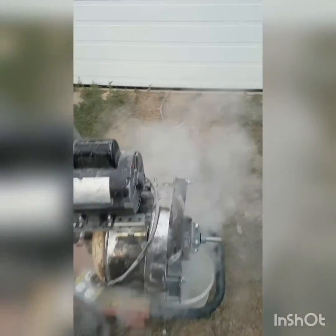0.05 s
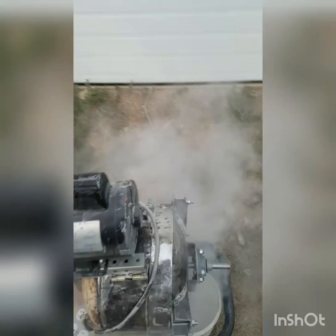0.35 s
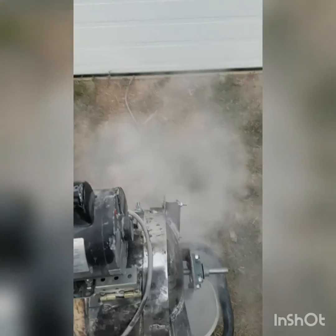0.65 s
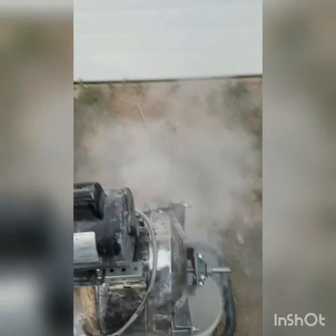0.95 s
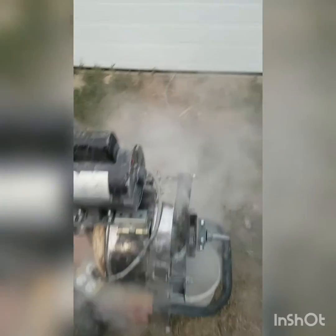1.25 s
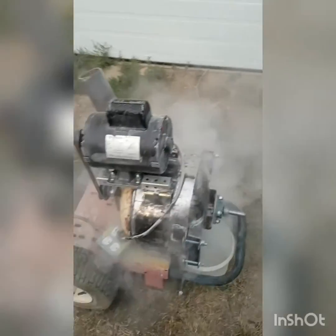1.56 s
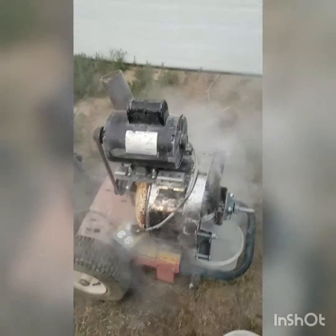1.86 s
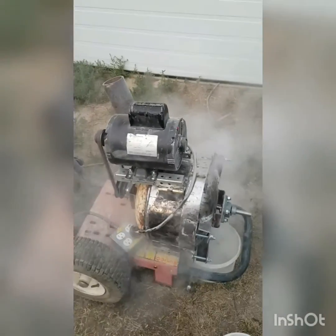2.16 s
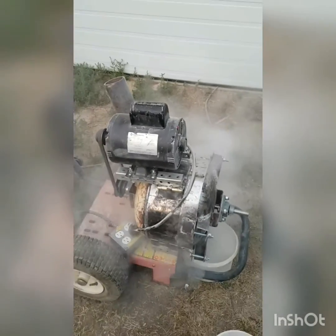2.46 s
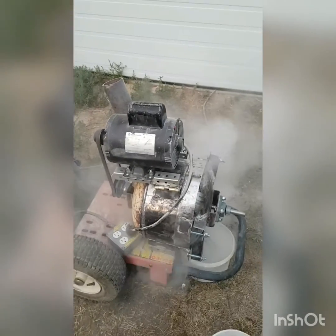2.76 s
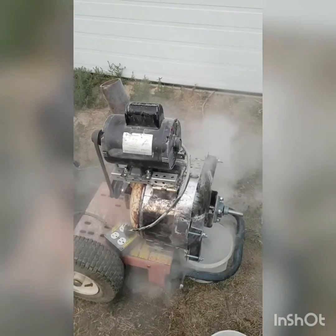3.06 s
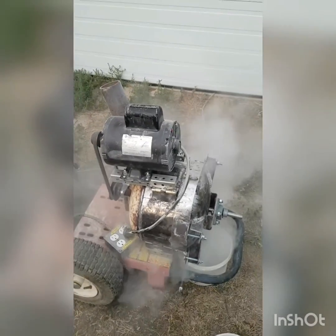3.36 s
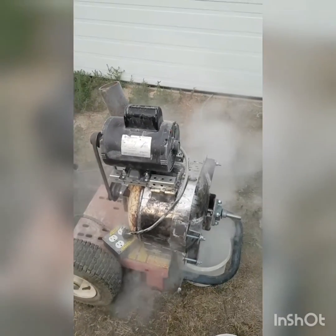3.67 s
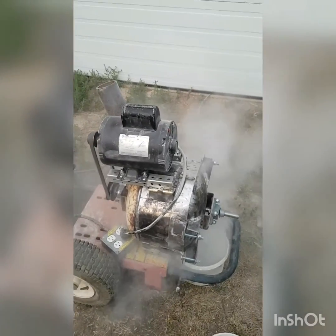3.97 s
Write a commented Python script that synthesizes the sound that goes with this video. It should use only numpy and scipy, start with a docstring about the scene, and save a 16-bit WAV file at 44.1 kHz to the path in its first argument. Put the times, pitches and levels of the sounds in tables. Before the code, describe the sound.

Rock crusher tumbling and breaking stones, with a hollow roar and hissing grit.

```python
"""Stones clatter over a hollow roar: a small motor-driven rock crusher is running outdoors, close by.
The stones tumble in its steel drum, making the air inside boom and the shell ring.
After about a second a fresh rock goes in with a crack and bumps about, jolting the frame, until it is
broken. The roar sinks, leaving the hiss of grit on steel, and then builds again."""
import sys
import numpy as np
from scipy import signal
from scipy.fft import rfft, irfft, next_fast_len
from scipy.io import wavfile

SR = 44100
rng = np.random.default_rng(int(sys.argv[2]) if len(sys.argv) > 2 else 0)


def digitize_waveform(pressure):
    """Quantize a signal to 16-bit integers and store it at the path in sys.argv[1].

    Rows of a 2-D input are taken as channels; values are limited to [-1, 1].
    """
    field = np.atleast_2d(pressure).T
    bounded = np.clip(field, -1, 1)
    quanta = np.round(bounded * 32767).astype(np.int16)
    wavfile.write(sys.argv[1], SR, quanta)


N = 176400  # 4 seconds

# All levels are relative: each layer gets its own gain when it is mixed.
# how loud the running crusher is (t/s, drum roar/dB, stone clatter/dB, grit hiss/dB)
RUNNING_LEVELS = [(0, -18, -14, -24), (.25, -23, -14, -26.5), (.295, -21.5, -16, -26.5),
                  (.36, -20.5, -12.5, -20.5), (.56, -20.5, -23, -24), (.68, -22.5, -14.5, -22),
                  (.85, -19.5, -13, -25.5), (1.04, -19.5, -12.5, -20), (1.085, -19.5, -17, -25),
                  (1.13, -26, -39, -18.5), (1.38, -39, -20.5, -19.5), (1.55, -39, -18.5, -20),
                  (1.8, -37.5, -25, -19), (2.25, -37.5, -29.5, -19), (2.45, -40, -23.5, -20.5),
                  (2.68, -36.5, -20, -18.5), (2.9, -32, -24.5, -22.5), (3.0, -33, -18.5, -20),
                  (3.2, -27.5, -19, -17.5), (3.55, -28.5, -20, -20.5), (3.68, -25, -13.5, -21.5),
                  (3.83, -23, -17.5, -20.5), (3.92, -23.5, -13, -18), (4, -23, -13.5, -18.5)]
# blows on the big rock (t/s, thud/dB, crack and clang/dB, splinters/dB, frame jolt left minus right/dB)
ROCK_BLOWS = [(1.093, -30, -10.5, -6.5, 0), (1.125, -10, -9, -15, 2), (1.151, -15.5, -19, -15, 0),
              (1.176, -24, -19, -16.5, 0), (1.19, -21, -13, -17.5, 2), (1.223, -11, -10.5, -22, 3),
              (1.241, -15, -16.5, -16.5, 3), (1.273, -18, -13, -18, 2), (1.291, -12, -12.5, -20, 14),
              (1.331, -17.5, -13, -24, -16), (1.41, -37, -30, -22, 9), (1.661, -23.5, -13, -17, -9),
              (1.681, -25, -33, -18, 9), (1.716, -38, -14, -23, 0), (1.897, -27, -23, -27, -17),
              (1.962, -31, -17, -17, -17), (2.13, -40, -18.5, -24.5, 0), (2.277, -20, -15, -22, 15)]
# single stones clanking on the shell (t/s, level/dB)
STONE_CLANKS = [(.005, -10.5), (.118, -32), (.164, -14.5), (.207, -19), (.311, -10.5), (.337, -16),
                (.446, -12.5), (.5, -9.5), (.538, -13.5), (.592, -11.5), (.77, -15), (.824, -22),
                (.859, -18), (1.445, -18), (1.47, -18), (1.502, -11), (1.582, -16), (1.617, -21),
                (1.935, -14), (2.053, -17), (2.095, -26), (2.196, -18), (2.298, -19.5), (2.97, -30),
                (3.312, -17), (3.61, -18), (3.889, -17.5)]
# spurts of grit, and swells of the drum's hollow ring as the load falls (t/s, length/s, level/dB)
GRIT_SPURTS = [(0, 0.028, -18.5), (0.056, 0.059, -18.5), (0.255, .04, -18), (0.342, 0.043, -21),
               (0.414, 0.029, -24), (0.595, .04, -19), (0.629, 0.044, -16.5), (0.884, 0.073, -17.5),
               (0.959, 0.083, -17), (2.2, 0.15, -31), (3.005, 0.03, -19), (3.888, 0.042, -19.5)]
DRUM_SWELLS = [(.07, 0.024, -30), (.42, 0.047, -13.5), (.55, 0.084, -13.5), (.72, 0.064, -14),
               (.88, 0.11, -17.5), (1.0, 0.043, -30), (3.87, 0.12, -25)]
# how freely the shell rings: the rock lying in it damps it (t/s, level/dB)
SHELL_FREEDOM = [(0, -1.5), (1.05, -3.5), (1.4, -17.5), (3.0, -8.5), (4, -5)]

# ringing tones of the air in the drum, the shell under stones and under grit, and the wheeled frame
# (f/Hz, time to fade by 60 dB/s, level/dB)
AIR_TONES = [(169, 0.046, -7.5), (204, 0.085, -5), (213, 0.18, -9), (317.4, 0.11, 3), (362, 0.18, 4.5)]
SHELL_TONES = [(702, 0.069, -17), (807, 0.096, -5.5), (1045.5, 0.14, 2), (1224, 0.056, -0.5),
               (1263, 0.28, -0.5), (1355, 0.16, 0), (1410, 0.11, -11), (1527, 0.14, -3.5),
               (1640, 0.24, -1.5), (1723, 0.1, 2), (1945, 0.084, 1), (2506, 0.4, -11)]
GRIT_TONES = [(2835, 0.18, -2.5), (3319, 0.09, -14), (3430, 0.14, -1.5), (3848, 0.028, 8), (4020, 0.037, 7),
              (5760, .07, 8), (6930, 0.079, 1.5), (7390, 0.031, -0.5)]
FRAME_TONES = [(58.4, .09, -10), (84, .08, -1.5), (119, 0.052, -4.5), (166, .06, -1), (236, 0.033, -3)]

# tone colour of each kind of hit, from bass to treble (f/Hz, level/dB)
SPRAY_SPECTRUM = [(1000, -25), (3000, -10), (4700, 0.5), (5800, 3.5), (7600, 2), (8600, -8.5),
                  (9800, -27.5), (11000, -22), (12500, -9.5), (16000, -8)]
CHIP_SPECTRUM = [(200, -13.5), (900, -15), (1500, 0), (2000, 6), (2900, -1.5), (4000, -2.5), (5000, -2.5),
                 (7000, -5), (12000, -39)]
DUST_SPECTRUM = [(3000, -51), (7500, -33), (8600, 0.5), (10000, -3.5), (12500, 4), (16000, -11.5)]
BOOM_SPECTRUM = [(20, -31), (35, -37), (60, -15.5), (125, -10.5), (160, -1), (260, 0), (400, -5.5),
                 (480, -14.5), (680, -3), (900, -6.5), (1500, -38)]
SHELL_SPECTRUM = [(100, -37.5), (500, -15), (900, -7.5), (1200, -2), (1700, 2), (2100, -1.5), (2800, -13),
                  (4000, -13), (8000, -52.5), (16000, -80)]
CRACK_SPECTRUM = [(100, -11), (400, -5.5), (750, 3), (1400, -6), (2200, 0), (3000, -17), (3900, -1.5),
                  (4600, -13), (8000, -27), (16000, -32)]
THUD_SPECTRUM = [(25, -22), (60, -3), (110, 2.5), (190, 2.5), (400, -2.5), (750, -5.5), (1500, -30),
                 (5000, -40)]
SPLINTER_SPECTRUM = [(200, -11), (800, -13), (2500, -2.5), (4000, -5), (7500, -11.5), (9500, -23.5),
                     (12500, -20.5), (16000, -29)]

# how much louder the left side is than the right (f/Hz, level/dB)
LEFT_MINUS_RIGHT = [(60, -3), (200, -0.5), (500, -5), (800, 1), (1300, 4.5), (2000, 0.5), (3000, -1),
                    (5000, -2), (6200, -7), (7700, -12.5), (9000, 0), (10200, 7), (12000, 5), (15500, 7.5)]
# the shell's panels swing against each other, so the sides hear them out of step (f/Hz, left lead/rad)
PANEL_PHASE = [(100, -8), (500, 2.4), (750, -1.85), (1280, -1.4), (1480, -2), (2500, -2), (3700, -2),
               (5000, -5.5)]

# a decay is the time a hit takes to fall to about a third of its strength
CRACK_DECAY_S, THUD_DECAY_S, CLANG_DECAY_S, SPLINTER_DECAY_S = 0.004, 0.0098, 0.031, 0.03
TIME = np.arange(N) / SR


def amp(db):
    """Turn decibels into a gain."""
    return 10 ** (np.asarray(db) / 20)


def unit(x):
    """Scale to an average strength (rms) of 1."""
    return x / np.sqrt(np.mean(x ** 2))


def level_curve(table, column):
    """Gain over time, gliding between the levels in one column of a table."""
    rows = np.array(table)
    return amp(np.interp(TIME, rows[:, 0], rows[:, column]))


def convolve(x, response):
    """Make every sample of x set off a copy of the response."""
    return signal.fftconvolve(np.atleast_2d(x), np.atleast_2d(response), axes=1)[:, :N]


def colour(spectrum, size=8192):
    """A short click with the given tone colour."""
    hz, db = np.array(spectrum).T
    grid = np.maximum(np.fft.rfftfreq(size, 1 / SR), 1)
    gains = amp(np.interp(np.log(grid), np.log(hz), db))
    cepstrum = irfft(np.log(gains))
    # pack the energy at the start of the click (minimum phase)
    cepstrum[1:size // 2] *= 2
    cepstrum[size // 2 + 1:] = 0
    return irfft(np.exp(rfft(cepstrum)))


def knock(hits, spectrum):
    """Each hit makes a short knock of the given tone colour."""
    click = colour(spectrum)
    return convolve(hits, click / np.linalg.norm(click))


def ring(hits, tones, size=8192):
    """Each hit sets off a group of fading tones."""
    t = np.arange(size) / SR
    response = sum(amp(db) / np.sqrt(fade_s) * amp(-60 * t / fade_s) * np.cos(2 * np.pi * hz * t)
                   for hz, fade_s, db in tones)
    return convolve(hits, response / np.linalg.norm(response))


def out_of_step(x):
    """Shift the left and right waves against each other, as the swinging panels do."""
    hz, radians = np.array(PANEL_PHASE).T
    size = next_fast_len(N + 4096)
    lead = np.interp(np.fft.rfftfreq(size, 1 / SR), hz, radians)
    turn = np.exp(1j * lead * np.array([[.5], [-.5]]))
    return irfft(rfft(x, size) * turn, size)[:, :N]


def impacts(per_s, scatter_db):
    """Randomly timed hits of uneven strength."""
    return (rng.random(N) < per_s / SR) * amp(scatter_db * np.clip(rng.standard_normal(N), -2, 2))


def contacts(per_s, scatter_db, shared):
    """A dense stream of tiny hits; the shared part reaches both sides alike."""
    both, left, right = (unit(impacts(per_s, scatter_db) * rng.choice([-1, 1], N)) for _ in range(3))
    return np.sqrt(shared) * both + np.sqrt(1 - shared) * np.array([left, right])


def showers(per_s, decay_s, scatter_db, steady):
    """Loudness curve of random bursts that start sharply and die away, over a steady part."""
    power = signal.lfilter([1], [1, -np.exp(-2 / (decay_s * SR))], impacts(per_s, scatter_db))
    return unit(np.sqrt(power / power.mean() + steady))


def blows(rows, decay_s, column):
    """Loudness curve of timed blows, each dying away from its level in the given column."""
    fades = ((TIME >= row[0]) * amp(row[column]) * np.exp(-np.abs(TIME - row[0]) / decay_s)
             for row in rows)
    return np.sqrt(sum(fade ** 2 for fade in fades))


def humps(rows):
    """Loudness curve of rounded swells."""
    return sum(amp(db) * np.sin(np.pi * np.clip((TIME - at) / length, 0, 1)) for at, length, db in rows)


def grit():
    """Grit sprays on the steel in puffs and spurts; coarse chips crunch and fine dust hisses along."""
    feed = level_curve(RUNNING_LEVELS, column=3)
    flow = np.hypot(feed, humps(GRIT_SPURTS))
    puffs = flow * showers(per_s=60, decay_s=0.021, scatter_db=6.1, steady=0.84)
    spray_hits = contacts(per_s=12000, scatter_db=4.0, shared=0.016) * puffs
    steel_hits = contacts(3000, 3.7, shared=0.28) * flow * showers(60, 0.025, 4.7, steady=0.27)
    chip_hits = contacts(9000, 3.8, shared=0.27) * feed * showers(110, 0.012, 9, steady=0.87)
    dust_hits = contacts(14000, 1.2, shared=0.58) * flow * showers(70, 0.034, 4, steady=0.45)
    return (amp(-3) * knock(spray_hits, SPRAY_SPECTRUM)
            + amp(-10.5) * ring(steel_hits, GRIT_TONES)
            + amp(-5) * out_of_step(knock(chip_hits, CHIP_SPECTRUM))
            + amp(-14.5) * knock(dust_hits, DUST_SPECTRUM))


def drum_roar():
    """The tumbling load makes the air in the drum boom and ring hollowly in swells."""
    load = level_curve(RUNNING_LEVELS, column=1) * showers(60, 0.027, 2.5, steady=2.2)
    swelling = np.hypot(load, humps(DRUM_SWELLS))
    boom = knock(contacts(3500, 1.8, shared=0.94) * load, BOOM_SPECTRUM)
    hollow = ring(contacts(3500, 1.0, shared=1.0) * swelling, AIR_TONES)
    return amp(-4) * boom + amp(-4.5) * hollow


def frame_jolts():
    """Each blow on the big rock jolts the frame once, often more on one side."""
    jolts = np.zeros((2, N))
    for at, thud_db, _, _, pan_db in ROCK_BLOWS:
        jolts[:, int(at * SR)] += amp(thud_db + np.array([pan_db, -pan_db]) / 2)
    softened = signal.sosfilt(signal.butter(2, 600, fs=SR, output="sos"), jolts)
    return amp(18.5) * ring(softened, FRAME_TONES)


def stone_clatter():
    """Flung stones rattle on the shell and set it ringing; larger ones and the big rock stand out."""
    tumble = amp(-3.5) * level_curve(RUNNING_LEVELS, column=2) * showers(70, 0.011, 1.4, steady=1.0)
    clanks = blows(STONE_CLANKS, CLANG_DECAY_S, column=1)
    rock_clangs = amp(-2) * blows(ROCK_BLOWS, CLANG_DECAY_S, column=2)
    force = np.sqrt(tumble ** 2 + clanks ** 2 + rock_clangs ** 2)
    freedom = level_curve(SHELL_FREEDOM, column=1)
    rattle = knock(contacts(9000, 2.9, shared=0.29) * force, SHELL_SPECTRUM)
    ringing = ring(contacts(5000, 4.2, shared=0.76) * force * freedom, SHELL_TONES)
    return out_of_step(amp(-3) * rattle + amp(-1.5) * ringing)


def big_rock():
    """Each blow on the big rock cracks, thuds in the drum and throws off splinters."""
    crack = contacts(12000, 1.2, shared=0.86) * blows(ROCK_BLOWS, CRACK_DECAY_S, column=2)
    thud = contacts(6000, 1, shared=0.26) * blows(ROCK_BLOWS, THUD_DECAY_S, column=1)
    splinters = contacts(16000, 2.2, shared=0.068) * blows(ROCK_BLOWS, SPLINTER_DECAY_S, column=3)
    return (amp(-0.5) * knock(crack, CRACK_SPECTRUM)
            + amp(-1) * knock(thud, THUD_SPECTRUM)
            + knock(splinters, SPLINTER_SPECTRUM))


def scene():
    """The whole crusher, with its own tone colour on the left and on the right."""
    crusher = drum_roar() + stone_clatter() + grit() + big_rock() + frame_jolts()
    sides = [colour([(hz, sign * db / 2) for hz, db in LEFT_MINUS_RIGHT]) for sign in (1, -1)]
    return convolve(crusher, sides)


def record(dry):
    """Thin the deepest bass, round off the loudest peaks and cut the highest treble."""
    bottom_hz, top_hz, ceiling = 36, 15900, 0.9
    thinned = signal.sosfilt(signal.butter(2, bottom_hz, "high", fs=SR, output="sos"), dry)
    rounded = thinned / (1 + np.abs(thinned / ceiling) ** 6) ** (1 / 6)
    return signal.sosfilt(signal.ellip(10, .2, 80, top_hz, fs=SR, output="sos"), rounded)


dry = scene()
out = record(dry)
digitize_waveform(out)
```